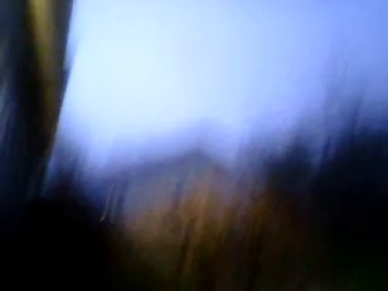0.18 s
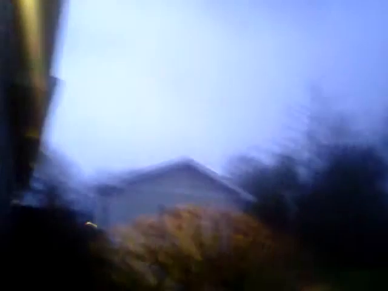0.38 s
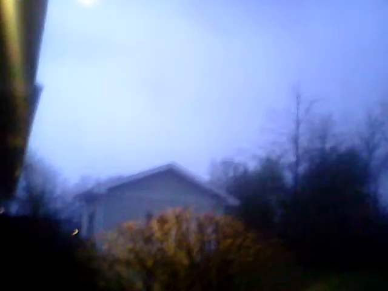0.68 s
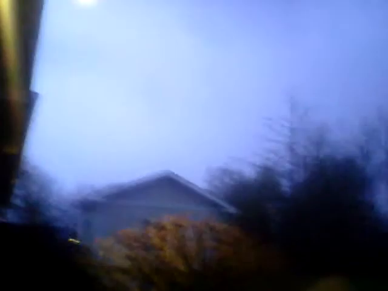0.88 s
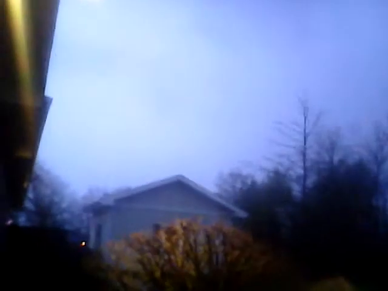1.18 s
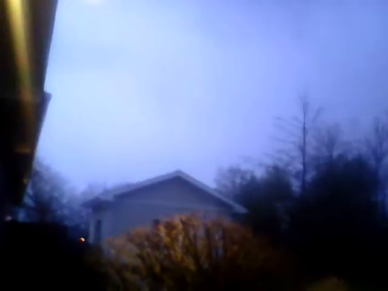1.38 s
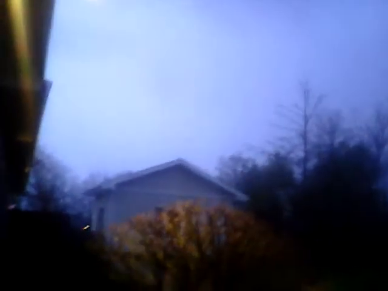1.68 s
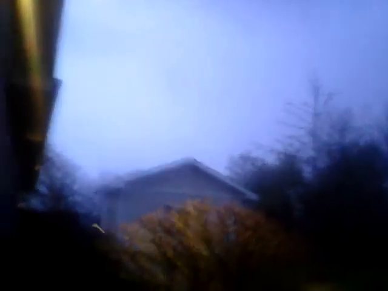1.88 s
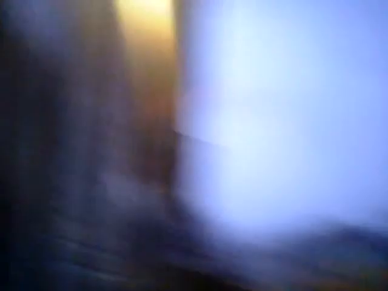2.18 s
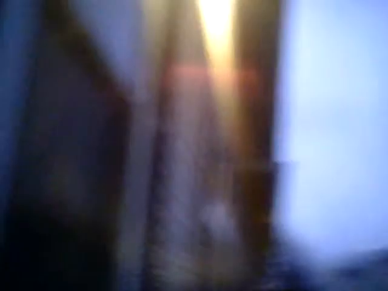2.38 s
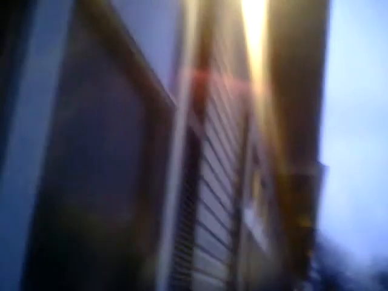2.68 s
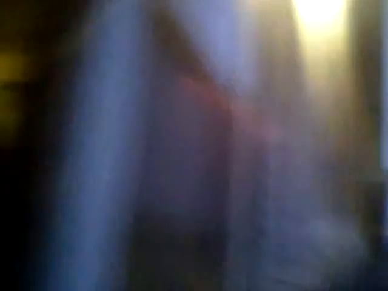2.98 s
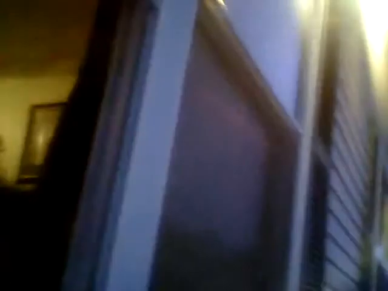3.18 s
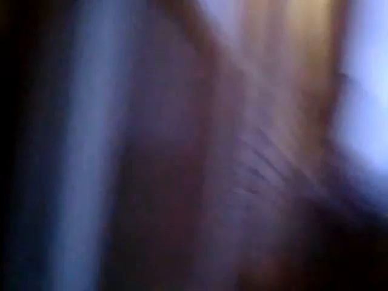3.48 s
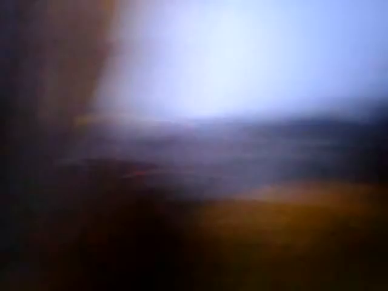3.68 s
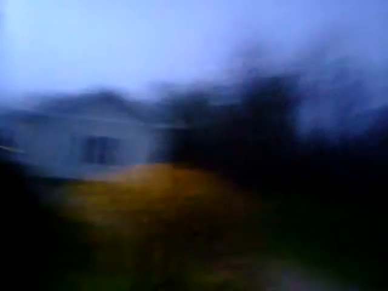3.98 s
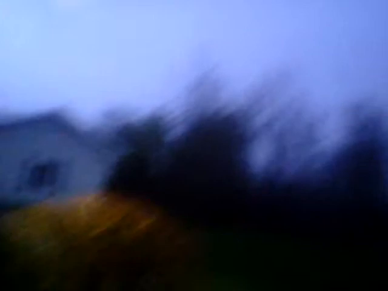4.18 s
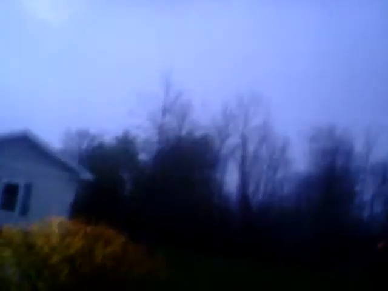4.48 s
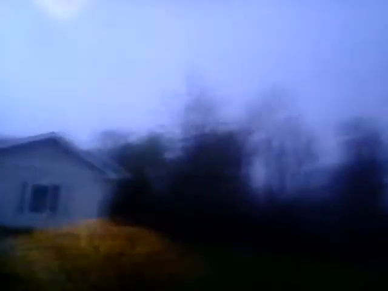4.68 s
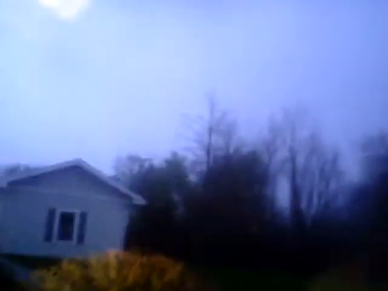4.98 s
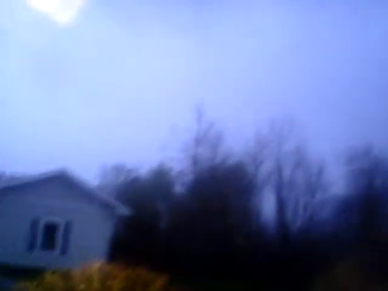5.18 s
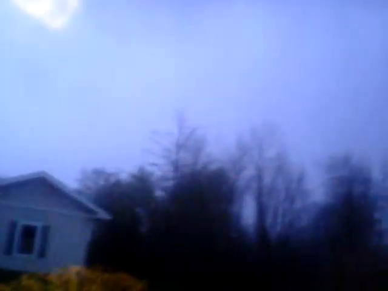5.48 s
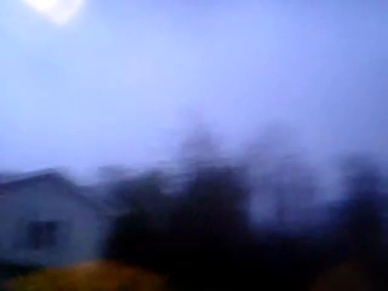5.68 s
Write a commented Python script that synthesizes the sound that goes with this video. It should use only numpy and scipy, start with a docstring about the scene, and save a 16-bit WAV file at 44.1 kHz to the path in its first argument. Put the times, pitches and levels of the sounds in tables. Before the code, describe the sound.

Steady heavy rain hisses over a garden, with a sharp click near two seconds, a hollow knock, and later soft handling bumps.

```python
"""Heavy rain hisses over a garden, heard from a doorway: shaped noise, with pattering drops mixed in.
Under it lies a low rumble of slow noise; above it are a thin sizzle and faint steady whine tones.
A hand-held camera clicks, bumps and scuffs: damped rings for the blows, shaped noise for the skin.
Near drops tick as short noise bursts. A hollow panel by the door gets one knock, later a quick pair."""
import sys
import numpy as np
from scipy import signal
from scipy.fft import rfft, irfft, next_fast_len
from scipy.io import wavfile
from scipy.ndimage import uniform_filter1d, map_coordinates

SR = 44100
rng = np.random.default_rng(int(sys.argv[2]) if len(sys.argv) > 2 else 0)


def log_audio(samples):
    """Write samples as a 16-bit WAV file to the path given in sys.argv[1]."""
    # one column per channel
    frames = np.atleast_2d(samples).T
    # limit to full scale, then quantise
    limited = np.clip(frames, -1, 1)
    pcm = np.round(limited * 32767).astype(np.int16)
    wavfile.write(sys.argv[1], SR, pcm)


N = 257984

# how hard the rain comes down: [t/s, strength/dB]
RAIN_STRENGTH = [(0.0, 0.2), (0.42, 0), (0.83, 0), (1.3, -1.85), (2.3, 1.6), (3.05, 2.1), (3.4, 0.7),
                 (3.74, 3.5), (4.65, -0.7), (5.03, 1.3), (5.45, 0.2), (5.85, 0.6)]
# tone colour of the wash on the lawn, the hiss in the bushes, the spray and the thin sizzle:
# [f/Hz, level per Hz/dB]; each curve sets only the balance, not the loudness
WASH_COLOUR = [(100, -29), (220, 3), (400, -6.5), (620, 0), (900, -1), (1150, -4), (1500, -9.5),
               (2500, -64)]
HISS_COLOUR = [(700, -4), (1200, -4.5), (1550, 2), (1900, -2), (2350, -5.5), (3050, -3.5), (3500, -6),
               (3950, -15.5), (5000, -60)]
SPRAY_COLOUR = [(3000, -24), (3900, -5.5), (4500, -0.5), (5600, 3.5), (6400, 0.5), (7300, -7.5),
                (7900, -13.5), (10400, -18), (11500, -18.5), (12200, -20), (15500, -24)]
SIZZLE_COLOUR = [(10000, -60), (10750, -6), (11050, 5), (11400, -3), (12200, -27)]
# tone colour of the low rumble: [f/Hz, level per Hz/dB]
RUMBLE_COLOUR = [(20, -48), (35, -11.5), (55, -4.5), (90, 0.5), (125, -3.5), (180, -9), (260, -30),
                 (500, -58)]
# the hand shifts its hold and the rumble swells: [middle t/s, half length/s, rise/dB]
SHIFTS = [(2.05, 0.3, 6), (3.03, 0.085, 6), (5.13, 0.34, 8)]
# the camera's faint electrical whine: [f/Hz, rms level/dB]
WHINE_TONES = [(6448.5, -93), (12897, -110)]
# clicks of the casing: [t/s, peak level/dB, contact sharpness f/Hz, push level/dB]
CLICKS = [(0.0846, -45, 1120, -11), (2.03, -30.5, 2650, -11.5), (2.3062, -11.5, 11000, -6.5),
          (2.6155, -26, 3320, -54), (2.8759, -30.5, 3140, -45)]
# ringing of the casing, and of the casing pushed as a whole:
# [f/Hz, starting level/dB, time to fall 60 dB/s]
CASING_MODES = [(570, -2.5, 0.022), (706, -6, 0.01), (1054, 2.5, 0.012), (1600, -8, 0.0082),
                (1776, 2.5, 0.0073), (3017, 2, 0.0095), (3270, 5.5, 0.0019), (5330, 0.5, 0.0017),
                (6450, -6.5, 0.013), (7620, 3, 0.0053), (8770, -2.5, 0.0052), (14200, -19, .002)]
PUSH_MODES = [(326, 2, 0.03), (460, 17, 0.018)]
# single drops close by: [t/s, peak level/dB, pitch f/Hz]
DROPS = [(1.008, -64, 7200), (1.133, -58.5, 7300), (2.506, -62, 7100), (2.739, -70, 10700),
         (3.361, -72, 13400), (4.035, -58, 7200), (5.741, -58, 8600)]
# fingers rubbing on the camera: [middle t/s, half length/s, rms level at the middle/dB]
RUBS = [(2.25, 0.25, -66.5), (3.08, 0.035, -64), (3.703, 0.24, -61), (4.053, 0.035, -53),
        (5.079, 0.03, -53.5)]
# tone colour of the rubbing: [f/Hz, level per Hz/dB]
RUBBING_COLOUR = [(40, -4), (100, -1), (220, 3), (400, -3), (850, -10.5), (1200, -18), (2500, -26),
                  (5000, -60)]
# hollow knocks: [t/s, blow's peak level/dB, contact sharpness f/Hz, bending delay at 1 kHz/s,
# scuff level/dB beside the blow, share of the free ring time]
KNOCKS = [(3.0255, -22, 2630, 0.0036, -19, 0.69), (5.2208, -31, 3600, 0.0011, -4.5, 0.95),
          (5.2273, -36, 890, 0.000906, -14, 0.95)]
# the hollow panel ringing freely: [f/Hz, starting level/dB, time to fall 60 dB/s]
PANEL_MODES = [(260, -21, 0.023), (475, -6, 0.028), (609, 7, 0.03), (765, -7, 0.028), (1140, -0.5, 0.017),
               (1330, 0.5, 0.026), (2280, -3.5, 0.018), (3420, -7, 0.0083), (5570, -6.5, 0.008)]
# soft bumps of the hand: [t/s, touch's peak level/dB, contact sharpness f/Hz,
# thump level/dB beside the contact, scuff level/dB beside the touch]
BUMPS = [ (3.686, -37.5, 450, -11, -28), (4.032, -45.5, 400, -8, -13), (4.8732, -21, 3300, -5, -15.5),
         (4.8764, -26, 444, 0, -26), (4.9506, -29, 600, -9, -18.5), (5.035, -37.5, 250, 2, -21),
         (5.0479, -36, 600, 1.5, -14.5), (5.124, -38.5, 553, -3, -10.5), ]
# the camera damped by the hand, and the whole camera rocking in it:
# [f/Hz, starting level/dB, time to fall 60 dB/s]
GRIP_MODES = [(158, -3, 0.024), (268, 0, 0.015), (374, -1.5, 0.035), (560, 3, 0.019), (770, -11, 0.0058),
              (1210, -1.5, 0.0082), (1800, 8.5, 0.006), (2300, -19, 0.0024)]
BODY_MODES = [(110.4, 7, 0.068), (185, -5, 0.036)]
# tone colour of skin sliding on plastic: [f/Hz, level per Hz/dB]
SKIN_COLOUR = [(40, -10), (120, 5), (220, 2.5), (780, 2), (1100, -12), (2000, -9), (3500, -17), (4200, -31),
               (6300, -25), (8000, -44), (15000, -69)]

# each rain layer's base level in dB, and the dB it gains per dB of strength
WASH_DB, WASH_GROWS = -66.5, 1.3
HISS_DB, HISS_GROWS = -64.5, 0.73
SPRAY_DB, SPRAY_GROWS = -77, 1.07
# the camera turns from the bushes to the open lawn: less hiss, more wash
TURN_S, TURN_TAKES_S, TURN_HISS_DB, TURN_WASH_DB = 3.8, 0.12, -1.6, 1.7
# base levels, before their wobbles and swells
SIZZLE_DB, RUMBLE_DB = -101, -64
# nothing is kept from this pitch upward
TOP_HZ = 15900


def amp(db):
    """Turn decibels into a gain."""
    return 10 ** (np.asarray(db) / 20)


def unit(x):
    """Scale x to an rms of 1."""
    return x / np.sqrt(np.mean(x ** 2) + 1e-20)


def crest(x):
    """Scale x to a peak of 1."""
    return x / np.abs(x).max()


def noise(count):
    """White noise: every pitch equally strong on average."""
    return rng.standard_normal(count)


def curves(rows):
    """Draw straight lines between the rows: one curve for each column after the time."""
    s, *columns = np.transpose(rows)
    return [np.interp(np.arange(N) / SR, s, column) for column in columns]


def wobble(rate):
    """A smooth random curve through `rate` random points a second."""
    points = noise(int(N * rate / SR) + 4)
    return map_coordinates(points, [np.arange(N) * rate / SR])


def swells(rows):
    """A smooth rise and fall for each (middle s, half length s, height)."""
    t = np.arange(N) / SR
    return sum(height * np.exp(-((t - s) / half) ** 2) for s, half, height in rows)


def coloured(x, spectrum):
    """Shape x by (Hz, dB) points joined along a log pitch axis, at an rms of 1."""
    size = next_fast_len(len(x) + 8192)
    f, db = np.transpose(spectrum)
    log_hz = np.log(np.fft.rfftfreq(size, 1 / SR) + 1)
    gain = amp(np.interp(log_hz, np.log(f), db))
    return unit(irfft(rfft(x, size) * gain, size)[:len(x)])


def add(track, s, sound):
    """Mix a sound into the track from time s on."""
    part = track[round(s * SR):][:len(sound)]
    part += sound[:len(part)]


def patchy(x, depth_db):
    """Let each band of the rain swell and thin on its own."""
    bands = signal.stft(x, nperseg=512)[2]
    # random gains, smoothed over neighbouring pitches and then over time
    field = uniform_filter1d(noise(bands.shape), size=4, axis=0)
    field = uniform_filter1d(field, size=16, axis=1)
    return unit(signal.istft(bands * amp(depth_db * unit(field)), nperseg=512)[1][:N])


def walls(x, echo_db, count):
    """Wall, eaves and door frame add weak early copies, which ripple the spectrum."""
    delays = rng.uniform(0.002017, 0.02, count)
    echoes = sum(np.roll(x, round(delay * SR)) for delay in delays)
    return unit(x + amp(echo_db) * echoes)


def shower(spectrum, drops_per_s, spread_db, near_db):
    """Countless far drops merge into noise; nearer ones patter out of it at uneven sizes."""
    lands = rng.random(N) < drops_per_s / SR
    size_db = spread_db * np.minimum(rng.exponential(size=N), 2.5)
    sizes = amp(size_db) * rng.choice([-1, 1], N)
    near = amp(near_db) * unit(lands * sizes)
    patter = patchy(coloured(noise(N) + near, spectrum), depth_db=1.66)
    return walls(patter, echo_db=-21, count=6)


def rain():
    """One strength drives the wash on the lawn, the hiss in the bushes and the spray."""
    strength_db, = curves(RAIN_STRENGTH)
    # 0 before the turn, 1 after it
    turned = 0.5 + 0.5 * np.tanh((np.arange(N) / SR - TURN_S) / TURN_TAKES_S)
    swell_db = 0.9 * wobble(4.85)
    wash_db = WASH_DB + WASH_GROWS * strength_db + TURN_WASH_DB * turned + 1.24 * wobble(25)
    hiss_db = HISS_DB + HISS_GROWS * strength_db + TURN_HISS_DB * turned + 0.26 * wobble(20)
    spray_db = SPRAY_DB + SPRAY_GROWS * strength_db + 0.48 * wobble(18)
    wash = amp(wash_db) * shower(WASH_COLOUR, drops_per_s=200, spread_db=0.5, near_db=-10.0)
    hiss = amp(hiss_db) * shower(HISS_COLOUR, drops_per_s=630, spread_db=3.5, near_db=-5.5)
    spray = amp(spray_db) * shower(SPRAY_COLOUR, drops_per_s=200, spread_db=17.0, near_db=-10.5)
    return amp(swell_db) * (wash + hiss + spray)


def sizzle():
    """A thin, high band of noise flickers on top of the rain."""
    return amp(SIZZLE_DB + 5.1 * wobble(22.11)) * coloured(noise(N), SIZZLE_COLOUR)


def rumble():
    """A low, uneven drone under the rain, which swells while the hand shifts."""
    level_db = RUMBLE_DB + swells(SHIFTS) + 2.7 * wobble(12)
    return amp(level_db) * coloured(noise(N), RUMBLE_COLOUR)


def whine():
    """Thin steady tones from the camera's electronics."""
    t = np.arange(N) / SR
    return sum(amp(db) * unit(np.sin(2 * np.pi * hz * t)) for hz, db in WHINE_TONES)


def blow_time():
    """The time axis of one short sound, in s."""
    return np.arange(SR // 6) / SR


def ring(modes, t):
    """Damped tones set off by one push; their strengths vary with the spot that is struck."""
    spot_db = 0.75 * noise(len(modes))
    out = np.zeros(len(t))
    for (hz, db, t60), extra_db in zip(modes, spot_db):
        out += amp(db + extra_db - 60 * t / t60) * np.sin(2 * np.pi * hz * t)
    return out


def contact(modes, sharp_hz, low_hz, travel_s):
    """A blow at a peak of 1; travel_s is the bending wave's delay at 1 kHz."""
    t = blow_time()
    hz = np.fft.rfftfreq(len(t), 1 / SR)
    # a soft touch excites fewer high tones
    force = 1 / (1 + 1j * hz / sharp_hz) ** 2
    # a small plate radiates little bass, and its material absorbs the highest treble
    bass_cut = signal.butter(4, low_hz, "high", fs=SR, output="sos")
    radiated = signal.sosfilt(bass_cut, ring(modes, t))
    absorbed = 1 / np.sqrt(1 + (hz / 11500) ** 8)
    # bending waves run at a speed that grows as the root of frequency, so the ring sweeps downward
    bending = np.exp(-4j * np.pi * travel_s * np.sqrt(1000 * hz))
    fade = np.cos(np.pi / 2 * t / t[-1]) ** 2
    return crest(fade * irfft(rfft(radiated) * force * absorbed * bending, len(t)))


def clicks():
    """The casing rings and is pushed as a whole, heard through the casing with no room on it."""
    out = np.zeros(N)
    for s, db, sharp_hz, push_db in CLICKS:
        push = amp(push_db) * contact(PUSH_MODES, sharp_hz, low_hz=141, travel_s=0.00017)
        click = contact(CASING_MODES, sharp_hz, low_hz=533, travel_s=0.000517)
        add(out, s, amp(db) * crest(click + push))
    return out


def drops():
    """Near drops burst into short high ticks: quickly fading noise shaped around a pitch."""
    out, t = np.zeros(N), blow_time()
    for s, db, hz in DROPS:
        # the order of these points matters: they do not simply climb in pitch
        band = [(0.65 * hz, -20), (1.05 * hz, -7), (hz, 0),
                (0.62 * hz, -7), (1.27 * hz, -25), (1.6 * hz, -60)]
        tick = amp(-60 * t / 0.029) * coloured(noise(len(t)), band)
        add(out, s, amp(db) * crest(tick))
    return out


def rubs():
    """Skin sticks and slips on plastic: a dull, rough rustle that swells and fades."""
    pressure = swells([(s, half, amp(db)) for s, half, db in RUBS])
    rough = amp(1.4 * wobble(160)) * noise(N)
    return pressure * coloured(rough, RUBBING_COLOUR)


def scuff(t60):
    """A short slide of skin that builds up just after a touch, then falls 60 dB per t60 s."""
    t = blow_time()
    return (1 - np.exp(-t / 0.0014)) * amp(-60 * t / t60) * coloured(noise(len(t)), SKIN_COLOUR)


def knocks():
    """Blows on a thin hollow panel, each with a slight slide; a lingering touch damps the ring."""
    out = np.zeros(N)
    for s, db, sharp_hz, delay_s, scuff_db, free in KNOCKS:
        damped = [(hz, level, t60 * free) for hz, level, t60 in PANEL_MODES]
        # a farther spot has a longer delay, so its ring sweeps down more slowly
        blow = contact(damped, sharp_hz, low_hz=288, travel_s=delay_s)
        add(out, s, amp(db) * (blow + amp(scuff_db) * scuff(t60=0.049)))
    return out


def bumps():
    """The hand touches, rocks and scuffs the camera, heard through the casing with no room on it."""
    out, t = np.zeros(N), blow_time()
    for s, db, sharp_hz, thump_db, scuff_db in BUMPS:
        # the rocking builds up gently
        rocking = ring(BODY_MODES, t) * (1 - np.exp(-t / 0.0083))
        thump = amp(thump_db) * crest(rocking)
        touch = crest(contact(GRIP_MODES, sharp_hz, low_hz=107, travel_s=0.000346) + thump)
        add(out, s, amp(db) * (touch + amp(scuff_db) * scuff(t60=0.11)))
    return out


def scene():
    """Mix the rain, the low and high steady layers, the knocks and the hand's sounds, in mono."""
    steady = rain() + sizzle() + rumble() + whine()
    events = clicks() + drops() + rubs() + knocks() + bumps()
    return (steady + events)[None]


def record(dry):
    """The camera's microphone keeps nothing from TOP_HZ upward."""
    size = next_fast_len(N + 8192)
    kept = np.fft.rfftfreq(size, 1 / SR) < TOP_HZ
    return irfft(rfft(dry, size) * kept, size)[:, :N]


dry = scene()
out = record(dry)
log_audio(out)
```